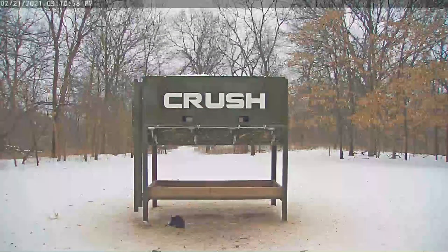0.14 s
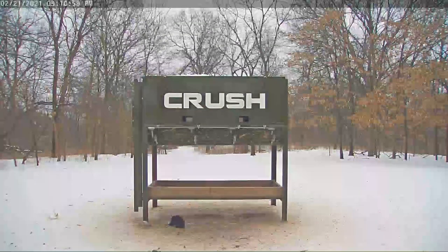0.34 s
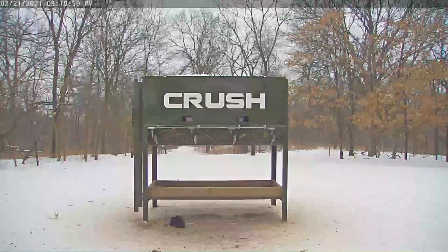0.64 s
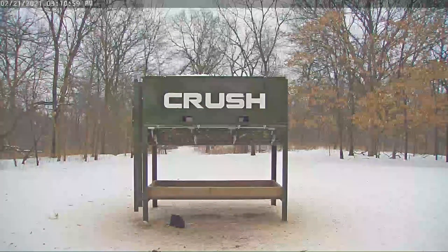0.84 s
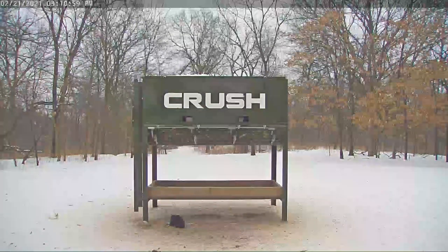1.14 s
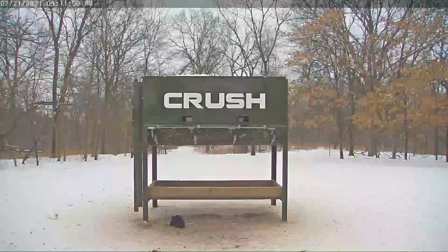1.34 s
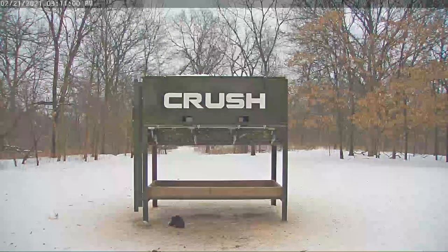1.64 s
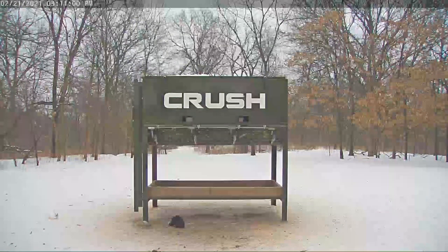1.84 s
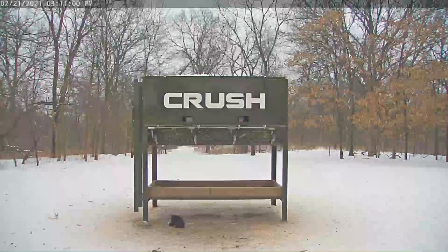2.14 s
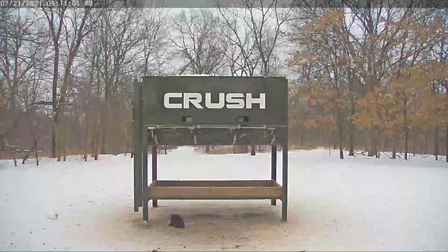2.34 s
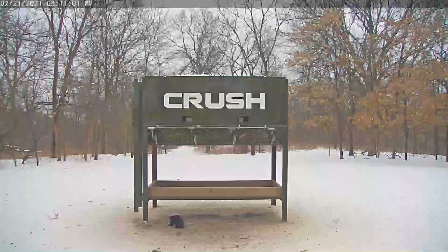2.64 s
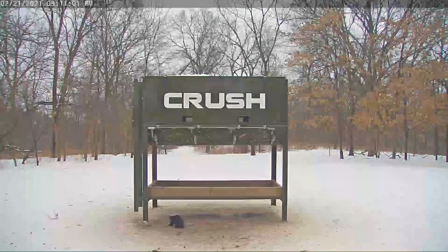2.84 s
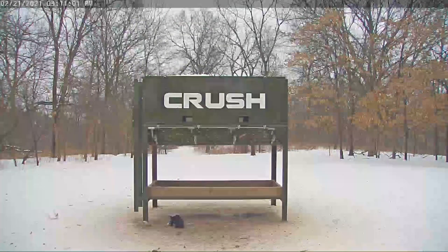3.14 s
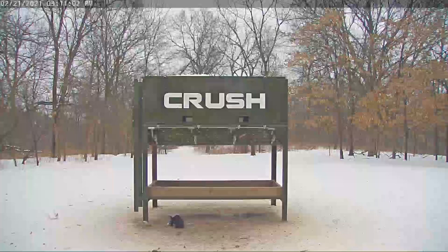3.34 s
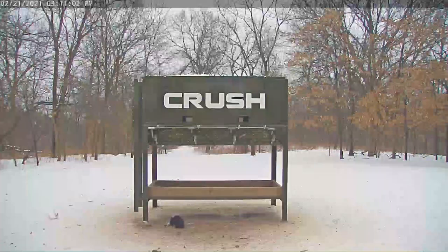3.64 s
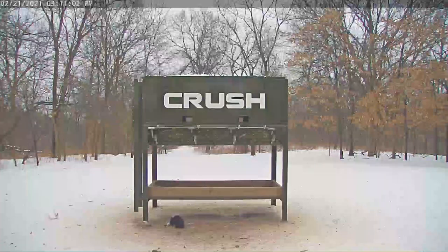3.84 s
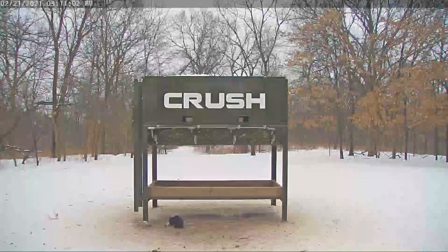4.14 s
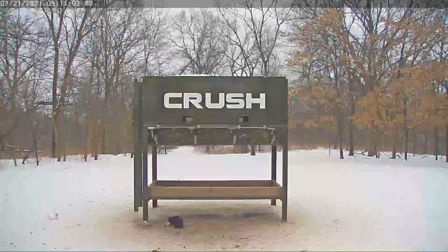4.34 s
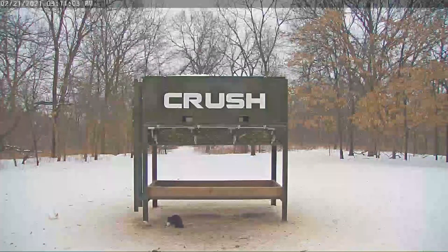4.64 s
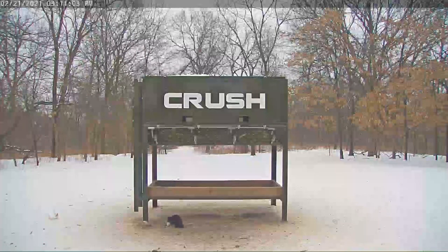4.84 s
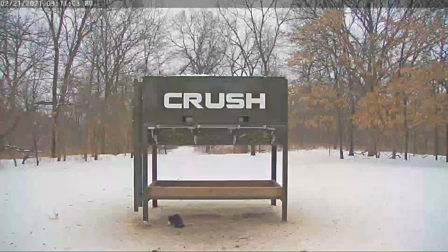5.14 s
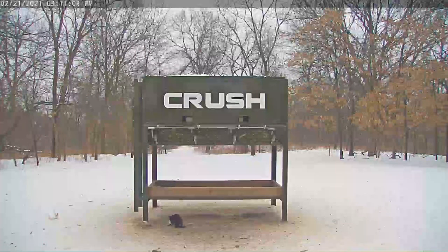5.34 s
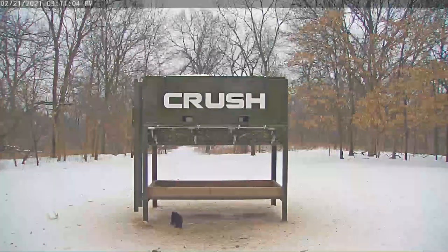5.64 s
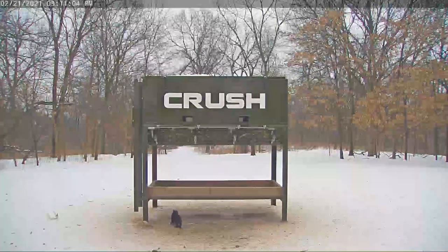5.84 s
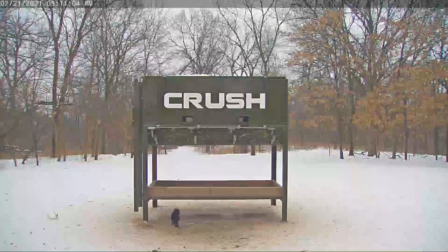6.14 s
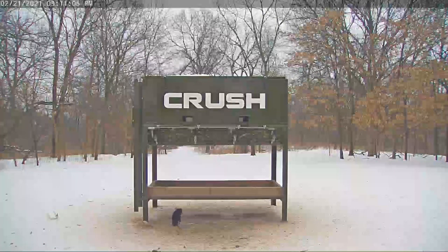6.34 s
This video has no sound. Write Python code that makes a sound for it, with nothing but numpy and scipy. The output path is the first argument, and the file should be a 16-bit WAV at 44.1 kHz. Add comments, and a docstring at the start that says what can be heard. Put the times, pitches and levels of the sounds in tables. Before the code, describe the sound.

Birds call in a woodland clearing, heard quietly through a small outdoor microphone with a steady low electrical hum and soft air. The trees give each call a light echo. A falling note opens, then three short harsh barks come at about 0.2, 0.7 and 1 second, the last with a chuck. A distant crow caws four times between 1.5 and 3.7 seconds, and a far woodpecker drums from 2.3 to 2.9. A few tiny dry ticks sound close by in the first 3.5 seconds. At 3 seconds a sharp chuck leads into a raspy jay scream, with a weaker one at 3.5. Another chuck and falling note at 4.5 precede the longest scream, from 4.8 to 5.3, overlapped by two barks and faint thin whistles. A very faint distant vehicle emerges after that, and two chucks with falling notes come at 6 and 6.3 seconds.

```python
"""Jays in a snowy clearing

Blue jays scream as the two sides of the syrinx beat together and break into rasp. Other birds add
harsh barks, sharp chucks, falling slurs and thin whistles; a crow caws, a far woodpecker excites the
modes of a trunk, and the trees scatter every call back. Dry ticks sound close by and a distant road
murmurs, all heard through a small outdoor camera with mains hum in its microphone."""
import sys
import numpy as np
from scipy import signal
from scipy.fft import rfft, irfft
from scipy.io import wavfile

SR = 44100
rng = np.random.default_rng(int(sys.argv[2]) if len(sys.argv) > 2 else 0)


def to_wav(sig):
    """Store sig (one row per channel, or 1-D mono) as 16-bit WAV at the path in sys.argv[1].

    Samples outside -1..1 are clipped; the rate is SR.
    """
    pcm = np.clip(np.atleast_2d(sig), -1, 1) * 32767
    pcm = np.round(pcm).astype(np.int16)
    wavfile.write(sys.argv[1], SR, pcm.T)  # frames by channels


N = 286650
TIME = np.arange(N) / SR
FREQS = np.maximum(np.arange(N // 2 + 1) * SR / N, 1)
CUTOFF_HZ = 7500   # upper edge of the camera's band


def from_db(db):
    """Amplitude ratio of a level in decibels."""
    return np.exp(np.asarray(db) * np.log(10) / 20)


def unit_rms(x):
    """Normalisation to unit power."""
    return x / np.sqrt(np.mean(x ** 2) + 1e-20)


def response(points, hz=FREQS):
    """Frequency response: gain interpolated in decibels over log frequency."""
    knots, db = np.transpose(points)
    return from_db(np.interp(np.log(hz), np.log(knots), db))


def resonances(modes, steepness=0.93):
    """Parallel resonators: their bell-shaped gains add."""
    return sum(from_db(db) / (1 + 2 * ((FREQS - hz) / width) ** 2) ** steepness
               for hz, width, db in modes)


def noise(gains):
    """Spectral shaping: Gaussian noise with a given gain at each frequency; rms 1."""
    white = rng.standard_normal((2, len(FREQS)))
    return unit_rms(irfft((white[0] + 1j * white[1]) * gains, N))


def drift(rate_hz):
    """Random modulation: noise low-passed at the given rate; rms 1."""
    return noise(1 / (1 + (FREQS / rate_hz) ** 4))


def phase_of(hz):
    """Phase is the time integral of frequency."""
    return 2 * np.pi * np.cumsum(hz) / SR


def sine(pitch, level_db):
    """A pure tone at a given rms level."""
    return from_db(level_db) * np.sqrt(2) * np.sin(phase_of(pitch))


def harmonics(pitch, throat, count):
    """Source and filter: a harmonic series weighted by the throat's response; rms 1."""
    phase = phase_of(pitch)
    gains = [throat(k * pitch) for k in range(1, count + 1)]
    tone = sum(g * np.sin(k * phase) for k, g in enumerate(gains, 1))
    return tone / np.sqrt(sum(g * g for g in gains) / 2)


def blend(tone, hiss, rasp):
    """Uncorrelated signals add in power: rasp is the share given to the hiss."""
    rasp = np.clip(rasp, 0, 1)
    return np.sqrt(1 - rasp) * tone + np.sqrt(rasp) * hiss


def arch(share, top=0.5):
    """Parabolic fall from a peak: zero at the top, one at both ends of a call."""
    top = np.clip(top, .05, .95)
    return np.maximum((top - share) / top, (share - top) / (1 - top)) ** 2


def edge_db(seconds, ramp_s, depth_db=18.0):
    """Parabolic attack or release: the level at a given time from a call's start or end."""
    return -depth_db * np.maximum(1 - seconds / ramp_s, 0) ** 2


def span(start, length):
    """Time window of a note: its samples and the seconds since its onset."""
    on = slice(*np.searchsorted(TIME, [start, start + length]))
    return on, TIME[on] - start


def course(calls):
    """Time gating: per sample, the current call's progress (0-1), gate, length and other columns."""
    calls = np.array(calls)
    current = np.maximum(np.searchsorted(calls[:, 0], TIME, "right") - 1, 0)
    start, length, *columns = calls[current].T
    share = np.clip((TIME - start) / length, 0, 1)
    gate = np.clip(np.minimum(TIME - start, start + length - TIME) / .004, 0, 1)
    return share, gate, length, *columns


# mains harmonics: frequency_hz, rms_db
MAINS_HUM = [(60, -52.8), (120, -80), (180, -66.5), (300, -76.5), (420, -75.5), (540, -87)]
# narrow bands of whine: centre_hz, rms_db
WHINE_BANDS = [(4250, -89.5), (4760, -97.5)]
# amplifier hiss: frequency_hz, density_db
HISS_SPECTRUM = [(300, -11.5), (3000, 6.5), (5500, -2), (6800, -5.5), (7400, -15.5), (8000, -32)]

def electronics(whine_width_hz=45, hiss_db=-78.0):
    """Electrical noise floor: mostly odd harmonics of the mains, a thin whine and amplifier hiss."""
    clock = TIME + rng.random()
    hum = sum(from_db(db) * np.sqrt(2) * np.sin(2 * np.pi * hz * clock) for hz, db in MAINS_HUM)
    whine = sum(from_db(db) * noise(resonances([(hz, whine_width_hz, 0)])) for hz, db in WHINE_BANDS)
    return hum + whine + from_db(hiss_db) * noise(response(HISS_SPECTRUM))


# outdoor air: frequency_hz, density_db
AIR_SPECTRUM = [(280, -32), (480, -14.5), (873, -4), (1050, -4), (1350, -7), (1870, -7), (2170, -13.5),
                (2410, -18), (2710, -20.5), (2980, -17.5), (3600, -18.5), (4650, -42), (6040, -36.5),
                (10200, -120)]
# its slow change in level: time_s, rms_db
AIR_LEVELS = [(0, -66), (3.1, -66.5), (4.3, -69), (5.3, -66), (6.5, -66)]
# low rumble: frequency_hz, density_db
RUMBLE_SPECTRUM = [(15, 10), (40, -2), (90, -7.5), (150, -10), (250, -15), (450, -13.5), (600, -17),
                   (900, -53)]

def outdoor_air(rumble_db=-63.0):
    """Ambient noise: a soft broad band whose level dips briefly, over a steady rumble."""
    air_db = np.interp(TIME, *np.transpose(AIR_LEVELS))
    air = from_db(air_db) * noise(response(AIR_SPECTRUM))
    return air + from_db(rumble_db) * noise(response(RUMBLE_SPECTRUM) * (FREQS < 1000))


def approach(arrival_s, arrival_db, growth_db_per_s, onset_db_per_s=26.5):
    """Gain of a nearing source: it rises quickly into earshot, then grows more slowly."""
    since = TIME - arrival_s
    return from_db(arrival_db + np.minimum(onset_db_per_s * since, growth_db_per_s * since))


# engine resonances: centre_hz, width_hz, gain_db
ENGINE_BANDS = [(78, 14, -7.5), (116, 10, -6), (178, 7.4, -10.5), (433, 250, -17)]

def far_vehicle():
    """Band-limited noise from an approaching vehicle: first the engine, then the song of the tyres."""
    engine = approach(5.3, -67.5, growth_db_per_s=2.0) * noise(resonances(ENGINE_BANDS))
    tyres = approach(5.92, -73, growth_db_per_s=8.7) * noise(resonances([(959, 55, 0)]))
    return engine + tyres


# sound scattered by the trees: frequency_hz, gain_db
ECHO_SPECTRUM = [(300, -15.5), (1000, -4.5), (1400, 2), (2200, -0.5), (3400, -1), (5000, -7), (8000, 0.5)]

def woods(x, near_t60_s, far_t60_s, far_db, delay_s=0.0034):
    """Reverberation by scattering: a quick decay from the forest edge, a faint long one from within."""
    late = np.maximum(TIME[:2 * SR] - delay_s, 0)
    decay = from_db(-60 * late / near_t60_s) + from_db(far_db - 60 * late / far_t60_s)
    echo = noise(response(ECHO_SPECTRUM))[:2 * SR] * decay * (late > 0)
    bird_band = np.abs(rfft(echo)[2 * 1000:2 * 3500])   # 1000-3500 Hz, brought to unit gain
    return signal.fftconvolve(x, echo / np.sqrt(np.mean(bird_band ** 2)))[:N]


# small dry ticks close by: start_s, relative_db
DRY_TICKS = [(0.586, -49), (0.6014, -58), (1.704, -59), (1.821, -48.5), (2.009, -64), (2.657, -55),
             (3.448, -53), (3.5064, -50)]
# their colour: frequency_hz, density_db
TICK_SPECTRUM = [(600, -30), (1400, 2), (2200, -0.5), (3000, 0), (4000, -3), (5000, -15.5), (7000, -15.5)]

def ticks(t60_s=0.031, gain_db=-4.5):
    """Damped transients: each tick is a burst of noise with a fast exponential decay."""
    fade = sum(from_db(db - 60 * np.clip((TIME - s) / t60_s, 0, 2)) * (TIME >= s) for s, db in DRY_TICKS)
    return from_db(gain_db) * fade * noise(response(TICK_SPECTRUM))


def strikes(blows, modes):
    """Modal ringing: each impulse excites every damped mode with a slightly different strength."""
    start_s, db = np.transpose(blows)
    out = np.zeros(N)
    for hz, mode_db, t60_s in modes:
        impulses = np.zeros(N)
        impulses[(start_s * SR).astype(int)] = from_db(db + mode_db + rng.standard_normal(len(db)))
        radius, angle = from_db(-60 / (t60_s * SR)), 2 * np.pi * hz / SR
        feedback = [1, -2 * radius * np.cos(angle), radius ** 2]
        ring = signal.lfilter([0, np.sin(angle)], feedback, impulses + 1e-18)
        out = ring - out   # neighbouring modes alternate in sign
    return out


# modes of the trunk: frequency_hz, gain_db, t60_s
TRUNK_MODES = [(602, -7.5, 0.031), (720, -11.5, .035), (990, -9.5, 0.011), (1300, -17.5, 0.0091),
               (2140, 2.5, 0.0013)]
# single blows and rolls: first_blow_s, last_blow_s, relative_db, change_per_blow_db
DRUM_ROLLS = [(.967, .967, -54.5, 0), (2.257, 2.257, -54.5, -2), (2.341, 2.615, -54.5, 0.37),
              (2.783, 2.861, -56, -2)]

def woodpecker(gap_s=.039, offbeat_db=-2.0, uneven_db=2.0, dull_hz=2300, gain_db=10):
    """Impact excitation: evenly spaced, unequal blows ring a trunk, and distance absorbs the treble."""
    blows = []
    for first, last, db, change_db in DRUM_ROLLS:
        count = 1 + round((last - first) / gap_s)
        for k, s in enumerate(np.linspace(first, last, count)):
            blows.append((s, db + change_db * k + offbeat_db * (k % 2) + uneven_db * rng.standard_normal()))
    lowpass = signal.butter(4, dull_hz, fs=SR, output="sos")
    return from_db(gain_db) * signal.sosfilt(lowpass, strikes(blows, TRUNK_MODES))


# caws: start_s, length_s, top_pitch_hz, level_db
CROW_CAWS = [(1.457, 0.14, 695, -55), (2.18, 0.15, 692, -56), (2.89, 0.16, 705, -56.5),
             (3.555, .15, 698, -55)]
# the crow's throat: frequency_hz, gain_db
CROW_TRACT = [(600, -20.5), (1000, -5.5), (1200, -3), (1380, 1.5), (1800, 2.5), (2100, -7), (2600, -27.5),
              (3400, -12.5), (3800, -18), (4500, -32)]

def crow(bend=0.36, jitter=.022, rasp=.14, attack_s=.035, release_s=0.045, flutter_db=2.0):
    """Formant filtering: the throat favours the second and third harmonics of a hoarse arch of pitch."""
    share, gate, length, top_pitch, level_db = course(CROW_CAWS)
    pitch = top_pitch * (1 - bend * arch(share, top=.48)) * (1 + jitter * drift(160))
    swell_db = edge_db(share * length, attack_s) + edge_db((1 - share) * length, release_s)
    tone = harmonics(pitch, lambda hz: response(CROW_TRACT, hz), count=6)
    voice = blend(tone, noise(response(CROW_TRACT)), rasp)
    return gate * from_db(level_db + swell_db + flutter_db * drift(90)) * voice


# small birds' whistles: start_s, length_s, first_hz, middle_hz, last_hz, level_db, jitter_ratio
THIN_WHISTLES = [(1.414, .09, 3380, 3370, 3310, -78, .016), (4.504, .035, 6350, 6800, 8200, -65, .01),
                 (5.009, .087, 7550, 7000, 7520, -63, .004), (5.08, 0.03, 7490, 7200, 7840, -71, .003),
                 (5.476, .52, 3500, 3180, 3130, -77.5, .028)]

def whistles(swell_db=16):
    """Frequency modulation: a pure tone wavers along one parabolic bend as it swells and fades."""
    out, waver = np.zeros(N), drift(260)
    for start, length, first, middle, last, db, jitter in THIN_WHISTLES:
        on, since = span(start, length)
        share = since / length
        bow_hz = middle - (first + last) / 2
        pitch = first + (last - first) * share + bow_hz * (1 - arch(share))
        out[on] += sine(pitch * (1 + jitter * waver[on]), db - swell_db * arch(share))
    return out


# falling notes, mostly with a chuck: start_s, length_s, first_hz, target_hz, level_db, jitter_ratio
FALLING_SLURS = [(0, 0.14, 2120, 2080, -60, 0.041), (0, .12, 3920, 3660, -65.5, 0.076),
                 (0.979, .095, 2330, 1674, -52.5, 0.034), (2.995, .06, 1720, 1440, -48, 0.024),
                 (3.022, 0.061, 3200, 3030, -57, 0.054), (4.575, .16, 2330, 2000, -55, .045),
                 (6.001, 0.062, 2160, 1907, -60, .08), (6.248, .035, 1450, 1370, -55, .04),
                 (6.257, 0.074, 2157, 1920, -56, .06)]

def slurs(settle_s=.03, edge_s=0.0027, fade_db=15.5):
    """Exponential glide: a tone made hoarse by jitter sinks towards a lower pitch as it fades."""
    out, waver = np.zeros(N), drift(300)
    for start, length, first, target, db, jitter in FALLING_SLURS:
        on, since = span(start, length)
        pitch = target + (first - target) * np.exp(-since / settle_s)
        level_db = db + edge_db(np.minimum(since, length - since), edge_s) - fade_db * since / length
        out[on] += sine(pitch * (1 + jitter * waver[on]), level_db)
    return out


# chucks: start_s, length_s, first_pitch_hz, last_pitch_hz, first_formant_hz, last_formant_hz,
# level_db, rasp_share
SHARP_CHUCKS = [(.958, 0.037, 750, 697, 1410, 1690, -52.5, 0.73),
                (2.987, .046, 563, 477.3, 5100, 3010, -49.5, 0.25),
                (4.541, 0.056, 602.5, 447.6, 4337, 1905, -52, 0.13),
                (5.986, 0.031, 820, 699, 4150, 3544, -59, 0.65),
                (6.239, 0.0273, 824, 675, 4100, 3400, -53, 0.4)]
# steady part of the throat's response: frequency_hz, gain_db
CHUCK_TRACT = [(300, -34.5), (600, -12.5), (900, -8.5), (1450, 3), (2200, -4), (2600, -3), (3200, -2),
               (3750, -3.5), (4300, -9), (5000, -8.5), (6000, -6), (7000, -27.5)]

def chucks(formant_db=15.0, formant_width_hz=480, jitter=.016, attack_s=0.014, sag_db=4):
    """Formant sweep: a throat resonance slides across the harmonics of a sharp, falling note."""
    share, gate, length, first, last, first_formant, last_formant, level_db, rasp = course(SHARP_CHUCKS)
    pitch = (first + (last - first) * share) * (1 + jitter * drift(400))
    formant = first_formant + (last_formant - first_formant) * share

    def throat(hz):
        boost_db = formant_db / (1 + ((hz - formant) / formant_width_hz) ** 2)
        return response(CHUCK_TRACT, hz) * from_db(boost_db)

    tone = harmonics(pitch, throat, count=11)
    hiss = noise(response(CHUCK_TRACT) * (FREQS < CUTOFF_HZ))
    envelope = from_db(level_db + edge_db(share * length, attack_s) - sag_db * share ** 2)
    return gate * envelope * blend(tone, hiss, rasp)


# barks: start_s, length_s, pitch_hz, level_db, rasp_share
HARSH_BARKS = [(.228, 0.1, 985.6, -51, 0.46), (.668, 0.085, 996.6, -51.5, 0.29),
               (1.04, 0.081, 1024, -53, 0.7), (5.01, 0.1, 1000, -53, 0.5),
               (5.255, 0.072, 1019, -49.5, 0.34)]
# throat resonances: centre_hz, width_hz, gain_db
BARK_FORMANTS = [(900, 170, 4.5), (1650, 470, -0.5), (2050, 400, -4.5), (2820, 770, -1.5),
                 (3350, 240, -9.5), (4120, 140, -22)]
# swell of each harmonic: peak_share_of_length, peak_db, loss_at_ends_db
BARK_SWELLS = [(0.23, -3.5, 19), (0.89, 2, 24), (0.7, -1, 27)]

def barks(rise=0.076, jitter=0.033, flutter_db=-2.0):
    """Time-varying spectrum: as the bill opens, energy moves up among three rough harmonics."""
    share, gate, _, pitch, level_db, rasp = course(HARSH_BARKS)
    phase = phase_of(pitch * (1 + rise * (share - .5)) * (1 + jitter * drift(345)))
    gains = from_db([db - loss_db * arch(share, top) for top, db, loss_db in BARK_SWELLS])
    tone = sum(g * np.sin(k * phase) for k, g in enumerate(gains, 1))
    tone_rms = np.sqrt(np.sum(gains ** 2, axis=0) / 2)
    hiss = tone_rms * noise(resonances(BARK_FORMANTS))
    return gate * from_db(level_db + flutter_db * drift(130)) * blend(tone, hiss, rasp)


# screams: start_s, length_s, top_pitch_hz, level_db, attack_s, release_s, clearest_share_of_length,
# least_rasp_share, bill_opening_share
JAY_SCREAMS = [(3.064, .238, 1618, -49, 0.049, 0.045, 0.18, 0.22, 0.2),
               (3.533, 0.18, 1670, -53, .05, 0.11, .05, 0.4, .15),
               (4.804, .461, 1618, -50, 0.061, 0.12, .31, 0.03, 1)]
# partials of the two sides of the syrinx: ratio_to_lower_voice, level_db
SYRINX_PARTIALS = [(1, -1.5), (1.29, -4.5), (1.452, -11), (1.9, -8), (2.05, -8)]
# throat resonances: centre_hz, width_hz, gain_db
JAY_FORMANTS = [(870, 310, -13), (1630, 240, -4), (2100, 97, 3), (2330, 30, 2), (2860, 220, -3),
                (3256, 46, -3), (3820, 130, -20)]
# resonances of the open bill: centre_hz, width_hz, gain_db
BILL_FORMANTS = [(3430, 290, 10.5), (4000, 490, 0)]

def jays(bend=0.06, jitter=0.029, partial_jitter=0.027, flutter_db=-0.5,
         rasp_per_s=5.5, most_rasp=.85, sag_db_per_s=9.5, bill_midway=.25, bill_rise_db=8):
    """Biphonation: the syrinx's two sides beat and break into rasp; an open bill adds treble."""
    share, gate, length, top_pitch, db, attack, release, clearest, least_rasp, opening = course(JAY_SCREAMS)
    pitch = top_pitch * (1 - bend * arch(share, top=.4)) * (1 + jitter * drift(44.3))
    swell_db = edge_db(share * length, attack) + edge_db((1 - share) * length, release)
    # away from its clearest moment a scream is weaker and hoarser
    from_clearest_s = length * np.abs(share - clearest)
    level_db = db + swell_db - sag_db_per_s * from_clearest_s
    rasp = np.minimum(least_rasp + rasp_per_s * from_clearest_s, most_rasp)
    # the bill narrows in mid-scream and is widest at the end
    gape = opening * (bill_midway + (1 - bill_midway) * arch(share))
    bill_gain = gape * from_db(bill_rise_db * (share - 1))
    tone = np.zeros(N)
    for ratio, partial_db in SYRINX_PARTIALS:
        partial_hz = ratio * pitch * (1 + partial_jitter * drift(182))
        tone += from_db(partial_db) * np.sin(phase_of(partial_hz))
    voice = blend(unit_rms(tone), noise(resonances(JAY_FORMANTS)), rasp)
    voice += bill_gain * noise(resonances(BILL_FORMANTS))
    return gate * from_db(level_db + flutter_db * drift(100)) * voice


# sensitivity of the microphone: frequency_hz, gain_db
MICROPHONE_RESPONSE = [(3800, 1), (4700, -3), (5300, -16), (6200, -9), (7200, -10.5), (8000, -17)]

def microphone(x):
    """Transducer response: the small microphone dulls everything above the birds' main band."""
    return irfft(rfft(x) * response(MICROPHONE_RESPONSE), N)


def scene():
    """Superposition: birds near and far, their echoes and the ticks, over outdoor and electrical noise."""
    near = jays() + slurs() + whistles()
    harsh, sharp = barks(), chucks()
    far = crow() + woodpecker()
    echoes = from_db(-6.5) * woods(near + from_db(1.5) * harsh, 0.35, 1.4, far_db=-12.5)
    echoes += from_db(-0.5) * woods(sharp, 0.72, 1.0, far_db=-16.0)
    echoes += from_db(-5.0) * woods(far, 0.98, 3.5, far_db=-9.0)
    heard = microphone(near + harsh + sharp + far + ticks() + echoes)
    return (heard + outdoor_air() + far_vehicle() + electronics())[None]


def record(dry):
    """Band limiting: the camera's steep low-pass filter removes the upper treble."""
    return signal.sosfilt(signal.ellip(10, .2, 70, CUTOFF_HZ, fs=SR, output="sos"), dry)


dry = scene()
out = record(dry)
to_wav(out)
```